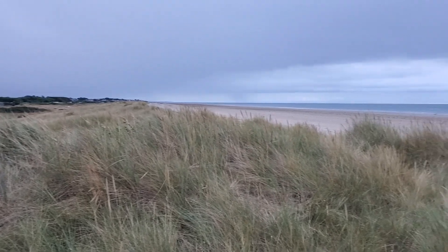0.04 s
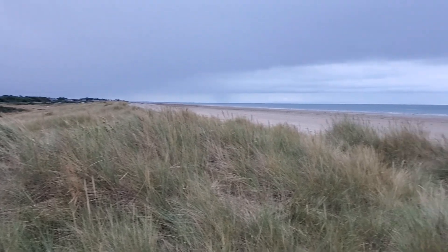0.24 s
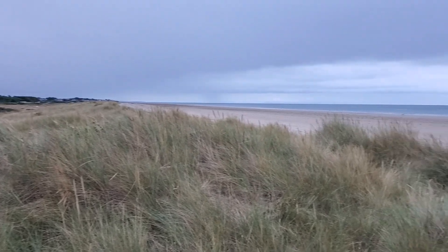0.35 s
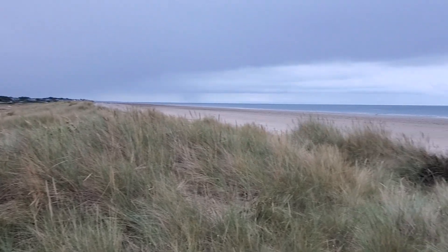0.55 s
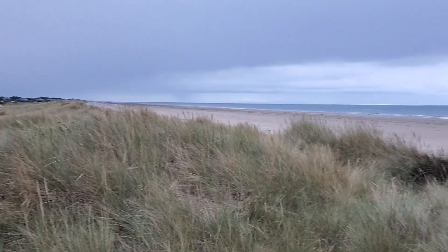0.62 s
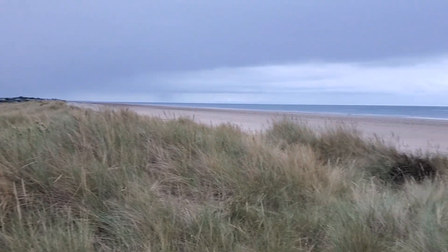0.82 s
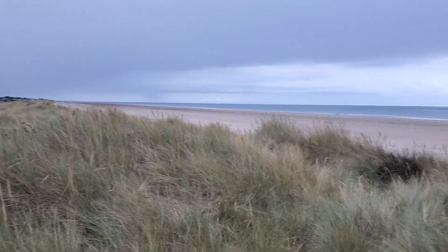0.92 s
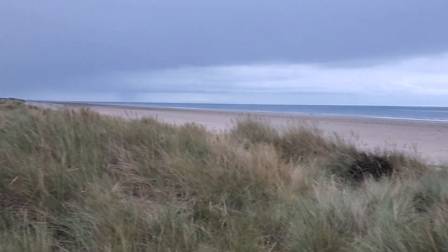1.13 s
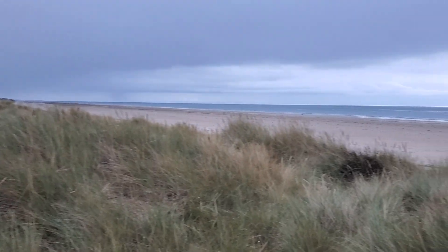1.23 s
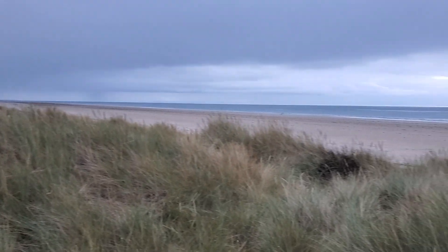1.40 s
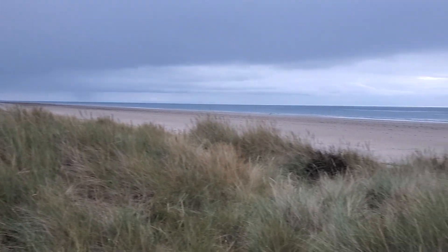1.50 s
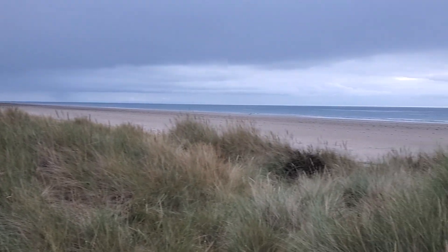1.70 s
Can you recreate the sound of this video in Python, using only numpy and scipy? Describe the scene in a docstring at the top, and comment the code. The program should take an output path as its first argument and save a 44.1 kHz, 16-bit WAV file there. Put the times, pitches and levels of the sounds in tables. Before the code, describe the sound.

Gusty wind buffets the microphone over a faint wash of surf and hissing grass.

```python
"""Wind on grassy coastal dunes buffets the microphone, mostly its right port, over faint surf and grass hiss.
The lumpy rumble, dotted with sharp eddies, starts low and gusts from 0.4 s. A brief swish comes at 0.46 s,
then a run of very high, thin chirps on the right, probably a bush cricket. At 1 s a far-off crack leaves
a short tail. The chirps return at 1.2 s; the wind drops at 1.5 s."""
import sys
import numpy as np
from scipy import signal
from scipy.fft import rfft, irfft
from scipy.io import wavfile
from scipy.ndimage import uniform_filter1d

SR = 44100
rng = np.random.default_rng(int(sys.argv[2]) if len(sys.argv) > 2 else 0)


def master_out(mix):
    """Clip the mix to full scale and print it as 16-bit PCM to the path in sys.argv[1]."""
    frames = np.transpose(np.atleast_2d(mix))
    ceiling = np.clip(frames, -1, 1)
    pcm = np.round(ceiling * 32767).astype(np.int16)
    wavfile.write(sys.argv[1], SR, pcm)


N = 77175
TIME_S = np.arange(N) / SR
FREQ_HZ = np.maximum(np.arange(N // 2 + 1) * SR / N, 1)


def from_db(db):
    return 10 ** (np.asarray(db) / 20)


def unit_rms(x):
    return x / np.sqrt(np.mean(x ** 2) + 1e-30)


def over_time(rows):
    """Rows of time_s, value, interpolated per sample."""
    return np.interp(TIME_S, *np.transpose(rows))


def over_freq(rows):
    """Rows of freq_hz, value, interpolated per bin on a log axis."""
    freq_hz, value = np.transpose(rows)
    return np.interp(np.log(FREQ_HZ), np.log(freq_hz), value)


def drift(rate_hz):
    """Random wander, unit RMS."""
    return unit_rms(irfft(rfft(rng.standard_normal(N)) / (1 + (FREQ_HZ / rate_hz) ** 2), N))


def noise(spectrum):
    """Coloured noise, unit RMS."""
    return unit_rms(irfft(rfft(rng.standard_normal(N)) * from_db(over_freq(spectrum)), N))


def stereo_noise(spectrum):
    """Coloured noise, unit RMS; the two ports agree in the bass."""
    # Likeness of the ports: freq_hz, correlation
    likeness = [(100, 1), (400, .6), (700, -0.071), (1100, -0.011), (1800, -0.1), (3000, 0.39),
                (16000, -0.23)]
    correlation = over_freq(likeness)
    mid, side = rfft(rng.standard_normal((2, N)))
    ports = np.sqrt(1 + correlation) * mid + np.sqrt(1 - correlation) * side * [[1], [-1]]
    return unit_rms(irfft(ports * from_db(over_freq(spectrum)), N))


def burst(start_s, attack_s, t60_s):
    """Linear rise, exponential decay."""
    age_s = TIME_S - start_s
    return np.clip(age_s / attack_s, 0, 1) * from_db(-60 * np.maximum(age_s - attack_s, 0) / t60_s)


def wind():
    """Wind pressure rumbles on both ports; the right one faces the wind."""
    # Pressure on the sheltered port: time_s, level_db
    lee_gusts = [(0, -65), (.36, -66), (.57, -60), (.63, -55), (.76, -62), (.91, -61), (.96, -51),
                 (1.08, -62.5), (1.3, -74), (1.36, -43.5), (1.43, -42.5), (1.49, -54.5), (1.75, -72)]
    # Pressure on the windward port: time_s, relative_db
    windward_gusts = [(0, -56), (.045, -58.5), (.076, -60), (.12, -56.5), (.2, -50), (.27, -53), (.32, -56),
                      (.365, -59.5), (.405, -39.5), (.44, -50), (.49, -34), (.56, -38), (.595, -46),
                      (.635, -41), (.68, -54.5), (.74, -42), (.778, -39), (.806, -47.5), (.88, -37.5),
                      (.94, -38), (.975, -39.5), (1.012, -61), (1.04, -41), (1.115, -56), (1.16, -45),
                      (1.212, -62), (1.262, -44), (1.316, -47.5), (1.345, -41), (1.405, -34), (1.432, -46),
                      (1.46, -41), (1.5, -59), (1.56, -53.5), (1.6, -61), (1.75, -61)]
    windward_gain_db = 3.5
    left = buffeting(over_time(lee_gusts))
    right = from_db(windward_gain_db) * buffeting(over_time(windward_gusts)) + eddies()
    return np.array([left, right])


def buffeting(pressure_db):
    """Turbulence on one port: each octave follows the pressure in lumps; harder wind reaches higher."""
    # Rumble at the reference pressure: freq_hz, relative_db
    spectrum = [(20, -28.5), (35, -8), (52, 3), (75, 2), (110, -8), (160, -17.5), (240, -21.5),
                (340, -36.5), (480, -36.5), (1400, -80.5)]
    reference_db, brighten_per_octave, brighten_from_hz = -42.5, 0.042, 100
    lump_db, lump_rate_hz, steady_s = 2, 34, 0.027
    flow, rumble = rfft(noise(spectrum)), 0
    for centre_hz in 25 * 2 ** np.arange(6):
        band = irfft(flow * np.maximum(1 - np.abs(np.log2(FREQ_HZ / centre_hz)), 0), N)
        power = uniform_filter1d(np.abs(signal.hilbert(band)) ** 2, int(steady_s * SR), mode="wrap")
        steady_band = band.std() * unit_rms(band / np.sqrt(power + 1e-20))
        octaves = max(np.log2(centre_hz / brighten_from_hz), 0)
        brighter_db = brighten_per_octave * octaves * (pressure_db - reference_db)
        rumble += steady_band * from_db(pressure_db + brighter_db + lump_db * drift(lump_rate_hz))
    return rumble


def eddies():
    """Each eddy pushes, then pulls on the port, which cuts the lowest bass."""
    # Eddies ahead of the low cut: centre_s, peak_db, half_width_s
    hits = [(.078, -33.5, .0021), (0.207, -34, 0.0025), (.395, -31.5, 0.002), (0.4899, -18.5, 0.0022),
            (.527, -30, 0.001), (0.543, -22.5, 0.003), (.556, -33.5, 0.0011), (0.626, -25, 0.0034),
            (0.743, -32.5, 0.0017), (.758, -33, .0017), (0.879, -24, .003), (.965, -19.5, .0011),
            (1.271, -36.5, .0014), (1.332, -31.5, 0.0013), (1.354, -26.5, 0.0012), (1.395, -34, 0.0012),
            (1.445, -43.5, .0012), (1.627, -46.5, 0.0019)]
    low_cut_hz = 38
    pressure = np.zeros(N)
    for centre_s, peak_db, half_width_s in hits:
        offset = (TIME_S - centre_s) / half_width_s
        pressure -= from_db(peak_db) * offset * np.exp((1 - offset ** 2) / 2)
    return signal.sosfilt(signal.butter(2, low_cut_hz, "high", fs=SR, output="sos"), pressure)


def far_crack():
    """One heavily damped pulse, left port first, and its tail rolling over the dunes."""
    # Damped tones: pitch_hz, relative_db, t60_s
    tones = [(694, 2, 0.0072), (1590, -5.5, .007), (2310, -9, 0.0088), (3700, -21, 0.0063)]
    # Outdoor tail: freq_hz, relative_db
    tail_spectrum = [(300, -15), (500, -9), (750, 0.5), (1000, 7.5), (1300, -24), (2500, -48)]
    start_s, right_lag_s, peak_db, tail_db = 1.0025, 0.00028, -45.5, -67
    age_s = np.maximum(TIME_S - start_s - np.array([[0], [right_lag_s]]), 0)
    pulse = 0
    for k, (pitch_hz, relative_db, t60_s) in enumerate(tones):
        decay = from_db(relative_db - 60 * age_s / t60_s)
        pulse += (-1) ** k * decay * np.sin(2 * np.pi * pitch_hz * age_s)
    tail = burst(start_s, attack_s=0.0033, t60_s=0.55) * stereo_noise(tail_spectrum)
    return from_db(peak_db) * pulse / np.abs(pulse).max() + from_db(tail_db) * tail


def cricket():
    """Rasping strokes, each swelling and fading, at the top of the hearing range."""
    # Strokes at the right port: centre_s, level_db, length_s
    strokes = [(0.58, -80, .055), (.65, -74, 0.072), (0.728, -72.5, 0.097), (1.248, -79, 0.11),
               (1.322, -72, .1), (1.404, -69, .105), (1.482, -69, 0.073), (1.566, -70.5, 0.097)]
    # Rasp: freq_hz, relative_db
    spectrum = [(9000, -34.5), (12000, -13.5), (13800, -16), (14400, -2.5), (14850, 0), (15300, 4),
                (15800, -5)]
    left_db, rough_db, tooth_rate_hz = -14, -3, 150
    envelope = np.zeros(N)
    for centre_s, level_db, length_s in strokes:
        offset = np.clip((TIME_S - centre_s) / length_s, -0.5, 0.5)
        envelope += from_db(level_db) * np.cos(np.pi * offset)
    rasp = unit_rms(noise(spectrum) * from_db(rough_db * drift(tooth_rate_hz)))
    return envelope * rasp * from_db([[left_db], [0]])


def swish():
    """Something brushes briefly close by."""
    # Brushing noise: freq_hz, relative_db
    spectrum = [(500, -16), (900, -3.5), (1200, 9), (1600, -16), (2100, -7), (2600, -6.5), (3080, -4),
                (3300, -28.5), (6000, -34)]
    level_db = -71.5
    return from_db(level_db) * burst(start_s=0.462, attack_s=0.016, t60_s=0.18) * stereo_noise(spectrum)


def surf():
    """A smooth, dull wash from the far beach."""
    # Wash: freq_hz, relative_db
    spectrum = [(100, -3.5), (300, 2.5), (520, -2), (800, 0), (1050, -8), (1450, -14.5), (2100, -19.5),
                (4000, -28.5), (8000, -50.5)]
    # Swell: time_s, level_db
    swell = [(0, -71), (.3, -71.5), (.52, -66.5), (.75, -71.5), (1.0, -68), (1.3, -71), (1.55, -73),
             (1.75, -73)]
    return from_db(over_time(swell)) * stereo_noise(spectrum)


def grass():
    """Grass hisses in the wind; the body flickers and the treble swells separately."""
    # Hiss at each port: freq_hz, relative_db
    left_spectrum = [(800, -12.5), (1500, 4.5), (2300, 0.5), (3300, 1), (4500, -5), (5700, -6.5),
                     (7400, -10), (8100, 2.5), (9400, -4), (12000, -2.5), (15500, -2.5)]
    right_spectrum = [(800, 4.5), (1500, -8), (2300, -0.5), (3300, -1.5), (4500, -3), (5700, -7),
                      (7900, -7), (9400, -5), (11500, -2), (15500, 0.5)]
    # Swell below and above the split: time_s, gain_db
    body_swell = [(0, -80), (.35, -80.5), (.54, -77), (.7, -78), (.92, -75.5), (1.18, -81.5), (1.43, -75),
                  (1.6, -80), (1.75, -81)]
    treble_swell = [(0, -80), (.36, -80.5), (.55, -75.5), (.68, -79), (.93, -76), (1.18, -80), (1.43, -78),
                    (1.6, -82), (1.75, -80)]
    right_db, flicker_db, split_hz = -0.5, 1.55, 6500
    hiss = np.array([noise(left_spectrum), from_db(right_db) * noise(right_spectrum)])
    body = irfft(rfft(hiss) * (FREQ_HZ < split_hz), N)
    treble = hiss - body
    body_db = over_time(body_swell) + flicker_db * drift(rate_hz=9.4)
    return body * from_db(body_db) + treble * from_db(over_time(treble_swell))


def scene():
    """Wind on the microphone over quiet dunes."""
    return wind() + surf() + grass() + cricket() + swish() + far_crack()


def record(dry):
    """Steep low-pass."""
    cutoff_hz = 15750
    return signal.sosfilt(signal.ellip(12, 0.1, 80, cutoff_hz, fs=SR, output="sos"), dry)


dry = scene()
out = record(dry)
master_out(out)
```